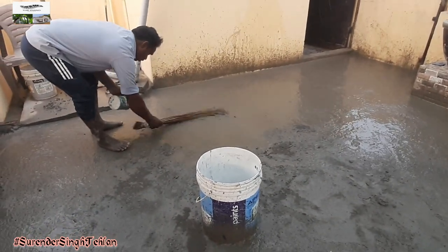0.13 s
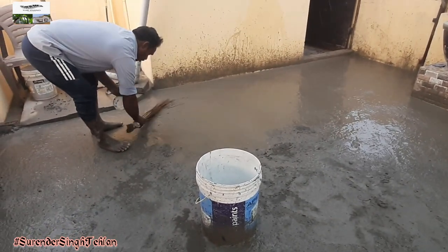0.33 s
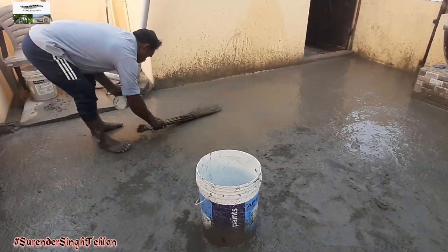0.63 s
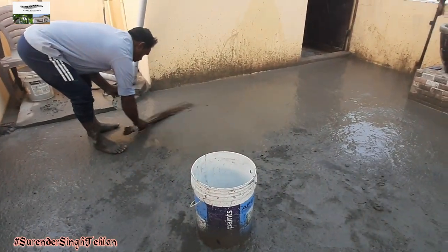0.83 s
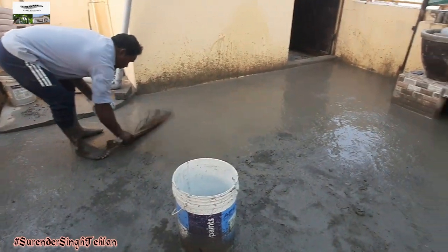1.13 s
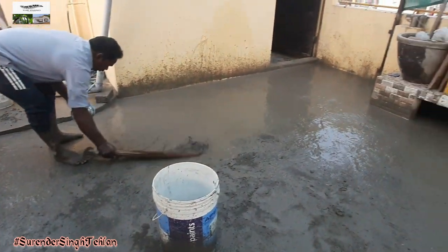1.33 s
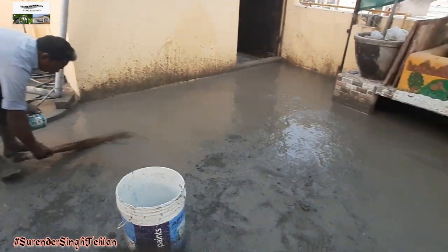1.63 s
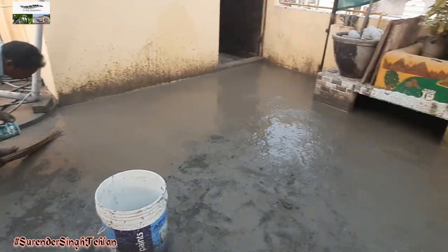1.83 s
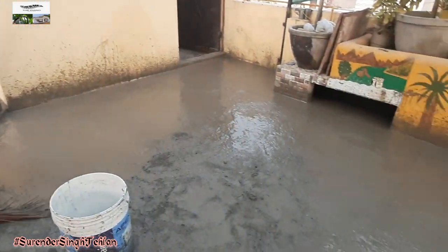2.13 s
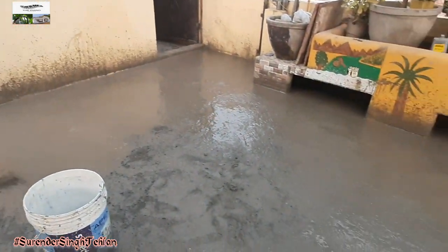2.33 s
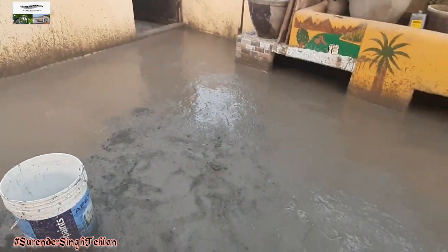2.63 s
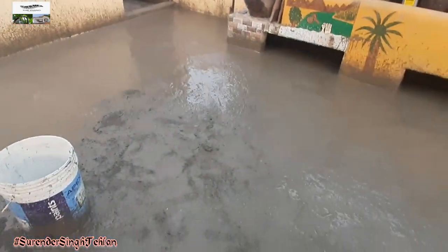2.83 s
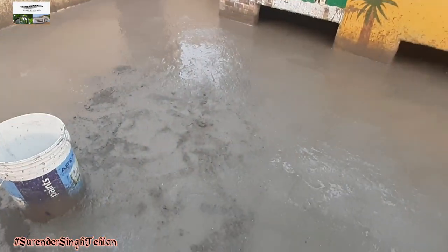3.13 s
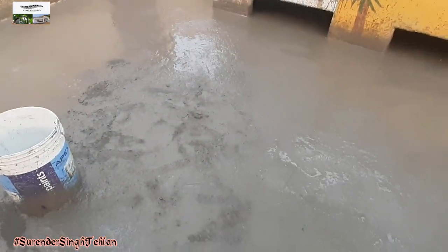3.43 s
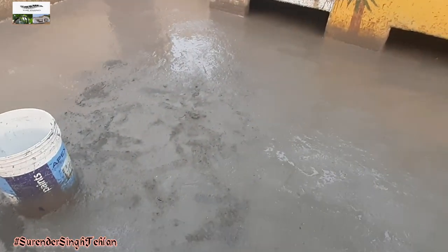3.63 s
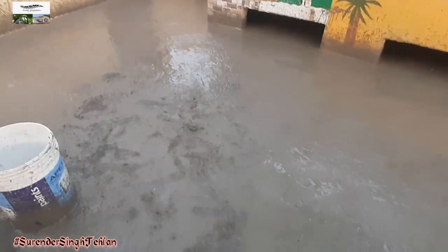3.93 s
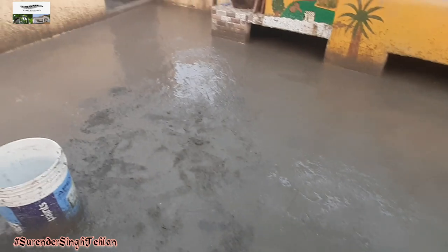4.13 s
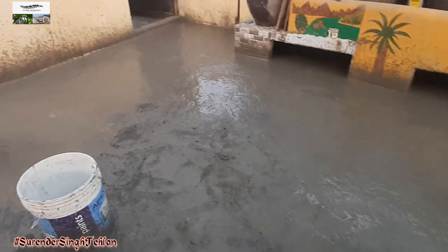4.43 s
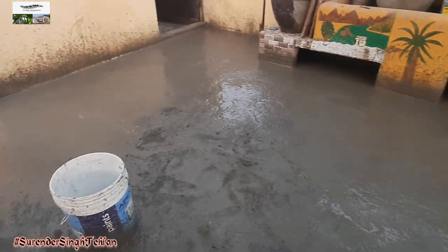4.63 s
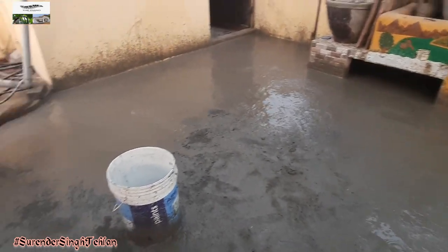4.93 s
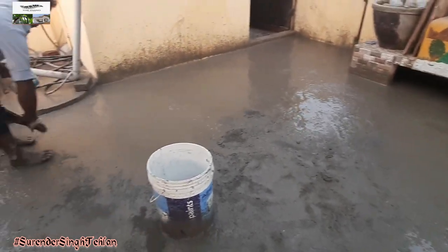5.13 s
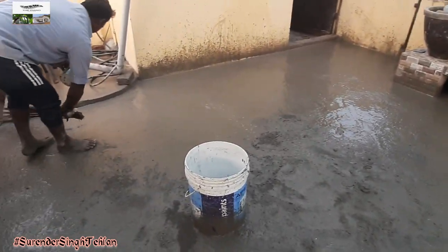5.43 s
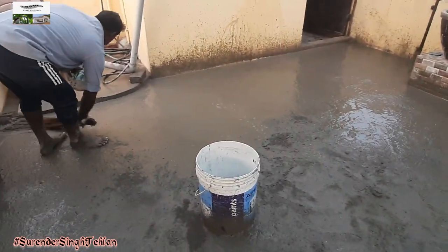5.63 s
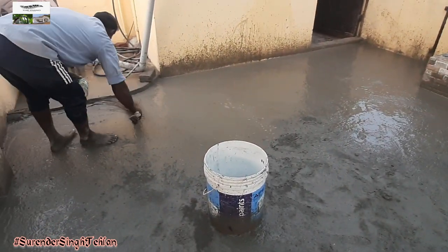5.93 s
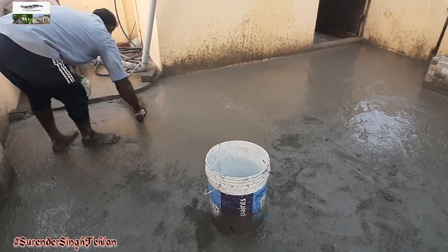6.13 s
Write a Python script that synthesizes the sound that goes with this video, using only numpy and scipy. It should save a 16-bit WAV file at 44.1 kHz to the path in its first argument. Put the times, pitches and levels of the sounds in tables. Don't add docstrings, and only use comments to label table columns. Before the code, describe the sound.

A walled outdoor terrace, heard through a handheld stereo phone, with low distant traffic rumbling throughout. From 0.1 to 3.2 s a stiff twig broom sweeps wet, gritty slurry to and fro, about nine strokes of 0.3 to 0.4 s each, swelling and fading as dense, bright scratching with faint squeaky chatter from the stems. It leans left, more so as the phone turns away. From 3.2 s the lifted twigs rustle faintly; at 3.6 s the bundle lands with one hard, dry, very short slap. A small engine then revs softly in the street, blipping around 4.4 and 4.7 s and strongest near 5.7 s, starting again at 6.2 s. Thin high flicks and drops tick between 3.7 and 5.6 s. A short, wet, splashy stroke comes at 4.1 s, a weaker one at 4.7 s, and one long sweep from 5.6 to 6.1 s, ending in light rustle. Short wall echoes follow the broom.

```python
import sys
import numpy as np
from scipy import signal
from scipy.fft import rfft, irfft
from scipy.io import wavfile
from scipy.ndimage import uniform_filter1d

SR = 44100
rng = np.random.default_rng(int(sys.argv[2]) if len(sys.argv) > 2 else 0)


def gain_from_decibels(decibels):
    exponent = np.asarray(decibels, float) / 20
    return 10 ** exponent


def file_out(sig):
    cols = np.atleast_2d(sig).T
    lim = np.clip(cols, -1, 1)
    pcm = np.round(lim * 32767).astype(np.int16)
    wavfile.write(sys.argv[1], SR, pcm)


N = 277477
TIME = np.arange(N) / SR
FRAME, HOP = 256, 64


def evened(x):
    return x / np.sqrt(np.mean(x ** 2) + 1e-20)


def read_curve(points, hz):
    f, value = np.transpose(points)
    return np.interp(np.log(hz + 1), np.log(f + 1), value)


def read_time(points, t):
    return np.interp(t, *np.transpose(points))


def drift(shape, *sizes):
    field = rng.standard_normal(shape)
    for axis, size in enumerate(sizes):
        for _ in range(2):
            field = uniform_filter1d(field, size, axis)
    return evened(field)


def slow_wander(per_s):
    points = drift(N // 32 + 2, max(int(SR / 64 / per_s), 1))
    return np.interp(np.arange(N) / 32, np.arange(len(points)), points)


def hump(hz, low_hz, high_hz):
    return 1 / (1 + (low_hz / (hz + 1)) ** 8) / (1 + (hz / high_hz) ** 8)


def burst(t, s, db, rise, t60):
    climb_db = 10 * (t - s) / rise
    decay_db = -60 * (t - s) / t60
    return gain_from_decibels(np.maximum(db + np.where(t < s, climb_db, decay_db), -200))


def arch(t, start, length, crest):
    u = np.clip((t - start) / length, 0, 1) ** (np.log(.5) / np.log(crest))
    return abs(np.sin(np.pi * u)) + 1e-9, u


def sides(db):
    return gain_from_decibels(np.array([db / 2, -db / 2]))


def add(mix, s, sound):
    part = mix[:, round(s * SR):][:, :sound.shape[1]]
    part += sound[:, :part.shape[1]]


# (frequency [Hz], level per Hz [dB])
STREET_COLOUR = [(25, -44), (45, -34), (75, 2), (125, -5), (160, -7.5), (260, -6), (420, -11.5), (700, -17),
                 (1100, -18), (2000, -21.5), (3500, -28.5), (4500, -34), (10000, -44), (15800, -55)]
# (frequency [Hz], likeness [-1 to 1])
STREET_LIKENESS = [(60, 1), (180, 0.88), (300, 0.91), (600, 0.46), (1500, 0.97), (5000, 0.17)]
# (frequency [Hz], lead [radians])
STREET_LEAD = [(150, .05), (340, 0.12), (600, 1.14), (1000, 1.83)]
# (time [s], level [dB])
TRAFFIC_SWELL = [(0, -44.5), (2.1, -44.5), (2.3, -47.5), (3.3, -44), (3.4, -48.5), (4.4, -42), (4.9, -47),
                 (5.78, -40.5), (6.29, -43)]


def street():
    rasp_db = 1
    frames = N // 256 + 5
    hz = np.fft.rfftfreq(1024, 1 / SR)[:, None]
    t = np.arange(frames) * 256 / SR
    a, b, c, d = rng.standard_normal((frames, 513, 4)).T
    left, other = a + 1j * b, c + 1j * d
    same = np.clip(read_curve(STREET_LIKENESS, hz), -1, 1)
    delayed = left * np.exp(-1j * read_curve(STREET_LEAD, hz))
    z = np.array([left, same * delayed + np.sqrt(1 - same ** 2) * other])
    swell_db = read_time(TRAFFIC_SWELL, t) + 49
    field_db = read_curve(STREET_COLOUR, hz) + hump(hz, 5, 1070) * swell_db
    field_db = field_db + hump(hz, 330, 1900) * rasp_db
    z *= gain_from_decibels(field_db + 1.53 * drift((513, frames), 3, 10))
    noise = signal.istft(z, nperseg=1024, noverlap=768)[1][:, :N]
    return gain_from_decibels(-46) * evened(noise)


# (start [s], length [s], load [dB], top firing rate [Hz])
REVS = [
    (3.66, 0.684, -47, 56.8),
    (4.43, 0.55, -51.5, 57.95),
    (4.744, 0.59, -52, 60.06),
    (5.299, .86, -38, 60.76),
    (6.192, 0.37, -48, 56.92),
]
# (multiple of firing rate, level [dB])
PIPE = [(1, 0.5), (1.5, -15.5), (2, -15), (3, -13), (4, -21.5), (6, -21.5)]


def engine():
    load_db, sag_hz = 15.5, 3
    start, length, db, top_hz = np.transpose(REVS)[:, :, None]
    throttle = arch(TIME, start, length, .48)[0]
    load = gain_from_decibels(db + load_db * np.log10(throttle))
    hz = (load * (top_hz - sag_hz * (1 - throttle))).sum(0) / load.sum(0)
    turns = np.cumsum(hz * (1 + .025 * slow_wander(8.94))) / SR
    orders = np.zeros(N)
    for k, order_db in PIPE:
        waver_db = (-0.5 + 1.1 * k) * slow_wander(3.4)
        orders += gain_from_decibels(order_db + waver_db) * np.cos(2 * np.pi * (k * turns + rng.random()))
    return gain_from_decibels(2.0) * load.sum(0) * orders


# (frequency [Hz], time to fall 60 dB [s])
WALLS = [(300, 0.25), (2000, 0.42), (6000, 0.22), (15000, 0.25)]


def walls(x):
    taps = np.zeros((2, SR // 2))
    at = np.arange(200, SR // 2 - 20, 20) + rng.integers(0, 20, (2, (SR // 2 - 201) // 20))
    np.put_along_axis(taps, at, rng.choice([-1., 1.], at.shape), 1)
    hz, t, z = signal.stft(taps, SR, nperseg=FRAME)
    decay = gain_from_decibels(-60 * t / read_curve(WALLS, hz)[:, None])
    tail = signal.istft(z * decay, SR, nperseg=FRAME)[1]
    return signal.fftconvolve(x, tail / np.linalg.norm(tail[0]), axes=1)[:, :N]


# (start [s], length [s], start pitch [Hz], end pitch [Hz], width [Hz], level [dB])
SQUEAKS = [(.1, 0.132, 1000, 1220, 118.8, -36), (.49, .17, 2800, 3310, 1200, -36.5),
           (1.119, 0.28, 1800, 2200, 700, -43), (1.93, 0.089, 2050, 1780, 129.6, -33.5),
           (2.28, 0.15, 2000, 2080, 350, -37), (2.44, 0.128, 1850, 1750, 300, -37.5),
           (2.62, 0.113, 1940, 1900, 356, -39), (3.01, .12, 1800, 2010, 350, -39),
           (5.88, 0.13, 1160, 1200, 132.4, -43), (4.64, 0.024, 1940, 2270, 111.1, -48),
           (5.3, 0.42, 1300, 2220, 756, -58.5), (3.8, 0.29, 3130, 3560, 760, -69)]


def squeaks():
    out = np.zeros((2, N))
    for s, length, start_hz, end_hz, width_hz, db in SQUEAKS:
        u = np.clip(TIME[:20000] / length, 0, 1)
        noise = rng.standard_normal((2, 20000)) + 1j * rng.standard_normal((2, 20000))
        r = np.exp(-np.pi * width_hz / SR)
        narrow = signal.lfilter([1], [1, -2 * r, r * r], noise)
        turns = np.cumsum(start_hz + (end_hz - start_hz) * u) / SR
        carried = (narrow * np.exp(2j * np.pi * turns)).real
        add(out, s, gain_from_decibels(db) * np.sin(np.pi * u) * evened(carried))
    return out


# (time [s], lead [samples], likeness of sides [0-1])
LEAD = [(.1, 3, .65), (.6, 5, .55), (1.2, 8, .55), (1.5, 12, .35), (1.75, 16, .45), (1.95, 21, .75),
        (2.3, 22.5, 1), (3.2, 22.5, 1), (4.4, 21.5, .9), (5.3, 19, .6), (5.7, 12, .55), (6, 8, .5)]


def slips(per_s, spread_db, count=N, start=0):
    size = gain_from_decibels(spread_db * np.minimum(rng.exponential(1, (3, count)), 5))
    size = size * (rng.random((3, count)) < per_s / SR)
    near, other, hidden = evened(size * rng.standard_normal((3, count)))
    s, samples, alike = np.transpose(LEAD)
    t = start + TIME[:count]
    alike = np.interp(t, s, alike)
    late = near[np.arange(count) - np.interp(t, s, samples).astype(int)]
    return np.array([near, alike * late + np.sqrt(1 - alike ** 2) * hidden, other])


# (frequency [Hz], share [0-1])
SHARED = [(500, .9), (1200, .85), (2500, .75), (5000, .45), (15000, .35)]
# (frequency [Hz], left-right difference [dB])
SHADE = [(300, 1.5), (1200, -1), (2000, 2.5), (3000, 4), (4300, 5.5), (5500, 6), (7000, 6.5), (8300, 10.5),
         (9500, 5), (11500, 6.5), (13000, 10.5), (15700, 13.5)]


def pair(hz, z, colour_db):
    gain = gain_from_decibels(colour_db)
    band = ((hz > 2600) & (hz < 9000)).ravel()
    gain = gain / np.sqrt((gain[band] ** 2).sum(0) / len(hz))
    shared = np.clip(read_curve(SHARED, hz), 0, 1)
    shade = gain_from_decibels(read_curve(SHADE, hz) / 2)
    right = shared * z[1] + np.sqrt(1 - shared ** 2) * z[2]
    return gain * np.array([z[0] * shade, right / shade])


def coloured(x, colour):
    hz = np.fft.rfftfreq(x.shape[1], 1 / SR)
    return irfft(pair(hz, rfft(x), read_curve(colour, hz)))


# (crest time [s], level [dB], rise [s], time to fall 60 dB [s])
SLAP_WAVES = [
    (3.583, -39.5, .003, .03),
    (3.59, -24.5, 0.0027, 0.053),
    (3.594, -15, 0.0018, 0.042),
    (3.607, -25.5, 0.0032, 0.052),
    (3.63, -53, .005, 0.164),
]
# (frequency [Hz], level per Hz [dB])
SLAP_COLOUR = [(80, -30), (200, -7.5), (400, -13), (680, -1), (1000, -8.5), (2300, -3), (3200, -6),
               (4700, 2), (6500, -4.5), (8400, -2.5), (12700, -1.5), (15800, -7)]


def slap():
    out, start = np.zeros((2, N)), 3.5
    t = start + TIME[:16384]
    shape = np.sqrt(sum(burst(t, *wave) ** 2 for wave in SLAP_WAVES))
    add(out, start, coloured(slips(35000, 0.62, count=16384, start=start) * shape, SLAP_COLOUR))
    return out * sides(1.5)[:, None]


# (time [s], peak level [dB], pitch [Hz], left-right difference [dB])
FLICKS = [(3.4136, -43, 8120, 7.5), (3.4531, -39, 9000, 7.5), (3.5553, -48, 12600, 9.5),
          (3.707, -27.5, 12000, 9), (3.72, -33, 11000, 8), (3.7903, -49, 11400, 5.5),
          (3.8237, -47, 11000, 5.5), (3.8856, -40, 9000, -7), (4.044, -45.5, 12500, 5),
          (4.0547, -37, 12000, 12), (4.0653, -41, 14600, 8), (4.0752, -25, 15300, 12),
          (4.5027, -44, 15500, 7), (4.5214, -38, 13000, 7), (4.6382, -31, 13000, 10),
          (4.645, -24, 12550, 7), (4.8474, -24.5, 15000, 11), (4.8858, -28.5, 14300, 11),
          (4.931, -31, 13500, 7), (4.9571, -36, 14900, 4), (5.0903, -40, 9400, 10), (5.1462, -33, 10700, 7),
          (5.1611, -36, 11100, 8), (5.1801, -29, 13000, 8), (5.2185, -24, 14500, 8), (5.497, -40, 5600, 10),
          (5.5263, -43, 4900, 4), (5.648, -32, 5440, 9), (6.2168, -40, 6500, 7), (6.2751, -37, 14220, 4)]


def flicks():
    out, t = np.zeros((2, N)), TIME[:4096]
    since = t - np.array([[0], [.0005]]) - .01
    for s, db, hz, pan_db in FLICKS:
        turns = np.maximum(min(hz, 14500) * since, 0)
        snap = turns * np.exp(1 - turns / 1.05) * np.sin(2 * np.pi * turns * (1 - .03 * turns))
        grains = slips(25000, 1.6, count=4096, start=s) * burst(t, .0105, -20, 0.0004, 0.018)
        rustle = coloured(grains, [(hz / 4, -12), (hz, 0)])
        both = 1.15 * snap * sides(pan_db)[:, None] + rustle * sides(pan_db - 6)[:, None]
        add(out, s - .0095, gain_from_decibels(db) * both)
    return out


# (start [s], length [s], level [dB], crest [share of length], lie of the stems [dB: flat +, steep -])
STROKES = [(0.071, 0.4, -30.5, 0.23, 2), (0.439, .3, -31.5, 0.45, -2), (.72, 0.35, -34.5, 0.41, 2.5),
           (1.03, .44, -28.5, 0.47, -2), (1.461, 0.42, -31.5, 0.42, 1), (1.85, 0.37, -28.5, 0.41, -0.5),
           (2.219, 0.44, -32, 0.44, 4), (2.591, 0.34, -30.5, 0.43, -1), (2.949, 0.28, -34.5, 0.45, -0.5),
           (4.121, 0.28, -31.5, 0.43, -1.5), (4.67, 0.19, -39, 0.38, -1.5), (5.633, .48, -30, 0.47, 0.5)]
# (start [s], level [dB], hold [s], time to fall 60 dB [s])
RUSTLES = [(0, -36.5, .002, 0.23), (0.046, -42.5, 0.024, .1), (0.377, -51, 1.4, .3),
           (1.604, -52.5, 1.38, .3), (3.196, -48, .01, 0.38), (3.3, -60.5, 0.0089, .3),
           (3.411, -61, .005, .15), (3.45, -71, .05, 0.52), (3.52, -69, .03, .1), (3.557, -59, .03, .1),
           (3.618, -50, 0.0069, 0.12), (3.699, -57, 0.022, 0.12), (4.056, -53, .012, .1),
           (4.073, -44, .01, .6), (4.15, -44, 0.023, 0.22), (4.365, -44.5, .033, .06), (4.42, -60, .1, 1),
           (4.631, -49, .01, .1), (4.64, -37, .012, 0.24), (4.862, -53, .02, .2),
           (4.887, -52.5, 0.011, 0.17), (4.915, -59, .015, .4), (5.081, -58, .018, 0.17),
           (5.147, -55.5, .05, .2), (5.194, -55.5, 0.024, 0.35), (5.489, -58.5, 0.0088, 0.13),
           (5.52, -61.5, 0.16, 0.68), (5.646, -41.5, .06, .3), (6.045, -47.5, .02, 0.33),
           (6.12, -61.5, 0.056, 2)]


def hand():
    speed_db, spray_speed_db = 25.5, 4
    ring_sag_db, spray_gain_db = -1.5, 2
    rustle_lie_db, rustle_spray_db = -1.5, -0.5
    idle_db = -76.5
    t = TIME[::32]
    start, length, db, crest, lie_db = np.transpose(STROKES)[:, :, None]
    speed, u = arch(t, start, length, crest)
    sweeps = gain_from_decibels(db + speed_db * np.log10(speed)) ** 2
    rustles = np.zeros(len(t))
    for s, rustle_db, hold, t60 in RUSTLES:
        rising = burst(t, s, rustle_db, .003, 99)
        falling = burst(t, s + hold, rustle_db, 99, t60)
        rustles += np.minimum(rising, falling) ** 2
    power = sweeps.sum(0) + rustles + gain_from_decibels(idle_db) ** 2
    lie_db = lie_db + ring_sag_db * (u - .5)
    lie_db = ((sweeps * lie_db).sum(0) + rustles * rustle_lie_db) / power
    spray_db = spray_gain_db * (u - .5) + spray_speed_db * np.log10(speed)
    spray_db = ((sweeps * spray_db).sum(0) + rustles * rustle_spray_db) / power
    return t, 10 * np.log10(power), lie_db, spray_db


# (frequency [Hz], level per Hz [dB])
TWIG_COLOUR = [(300, -14.5), (700, -11.5), (1200, -7.5), (1600, -8), (2100, -3.5), (2900, -2), (4300, -1),
               (5600, -1.5), (7000, -4), (8300, -2), (10000, -4.5), (11800, 0), (13500, -2.5), (15800, -5)]
# (time [s], slurry spray [dB])
WET = [(0, -5.5), (.3, -5), (.6, -2), (.85, -5), (1.3, -1.5), (1.6, -6), (1.8, .5), (2.3, -2), (2.75, 3),
       (3.1, -1), (3.5, -0.5), (4.1, 5.5), (4.3, 0.5), (4.8, 2.5), (5.2, 1), (5.7, -5), (6, -3.5),
       (6.29, 1)]


def strokes():
    s, level_db, lie_db, spray_db = hand()
    level_db = np.interp(TIME, s, level_db)
    light = np.clip((-40.5 - level_db) / 16, 0, 1)
    sparse = .06 + .34 * light
    grit = np.sqrt(1 - sparse) * slips(30000, 0.9) + np.sqrt(sparse) * slips(2500, 2.4)
    chatter_db = (.7 + 1.6 * light) * slow_wander(60)
    pan_db = -1.5 + 0.0945 * np.interp(TIME, *np.transpose(LEAD)[:2])
    grit *= gain_from_decibels(level_db + chatter_db + 1.5) * sides(pan_db)[[0, 1, 1]]
    hz, t, z = signal.stft(grit, SR, nperseg=FRAME, noverlap=FRAME - HOP)
    hz = hz[:, None]
    drag_db = hump(hz, 300, 1270) * np.interp(t, s, 1.38 * lie_db - 1.5)
    ring_db = hump(hz, 1200, 2860) * np.interp(t, s, lie_db + 1.0)
    wet_db = hump(hz, 6340, 30000) * (read_time(WET, t) + np.interp(t, s, spray_db))
    patchy_db = 1.16 * drift(z.shape[1:], 4, 12)
    z = pair(hz, z, read_curve(TWIG_COLOUR, hz) + drag_db + ring_db + wet_db + patchy_db)
    return signal.istft(z, SR, nperseg=FRAME, noverlap=FRAME - HOP)[1][:, :N]


def scene():
    broom = strokes() + flicks() + slap() + squeaks()
    return street() + engine() + gain_from_decibels(-10.5) * walls(broom) + broom


def band_limit(x):
    return signal.sosfilt(signal.butter(12, 17020, fs=SR, output="sos"), x)


def record(dry):
    rounded = .85 * np.tanh(dry / .85)
    low_cut = signal.sosfilt(signal.butter(3, 42, "high", fs=SR, output="sos"), rounded)
    top_cut = signal.firwin(301, 15760, window=("kaiser", 9), fs=SR)
    mix = signal.oaconvolve(low_cut, top_cut[None], "same")
    return band_limit(mix)


dry = scene()
out = record(dry)
file_out(out)
```